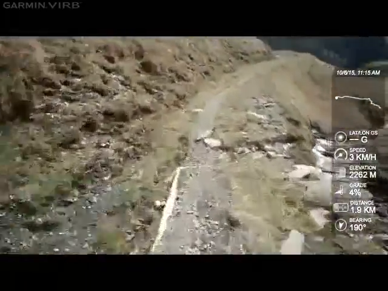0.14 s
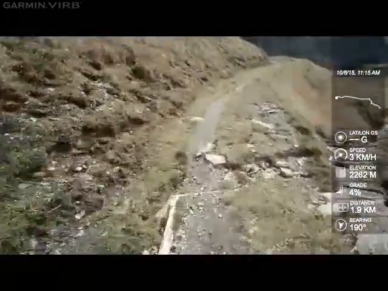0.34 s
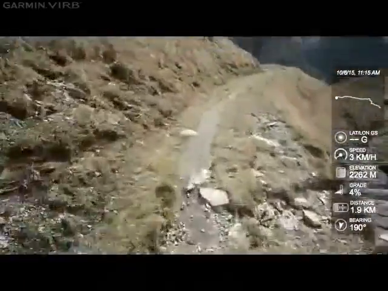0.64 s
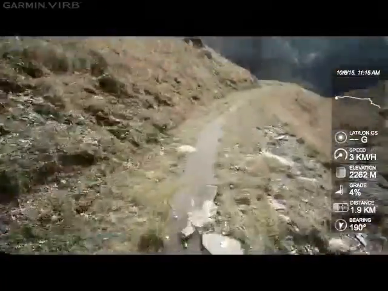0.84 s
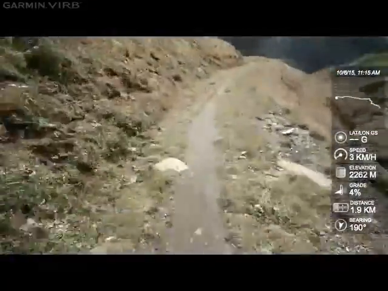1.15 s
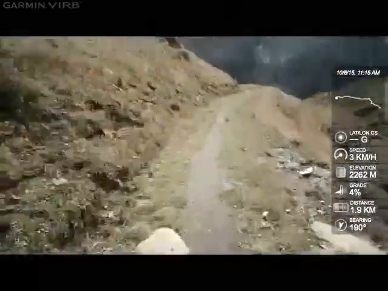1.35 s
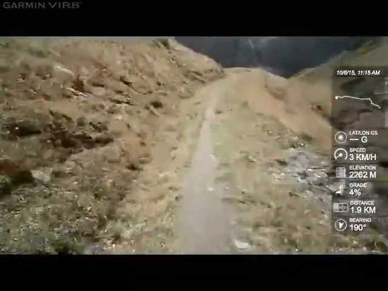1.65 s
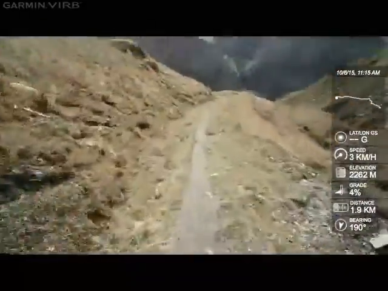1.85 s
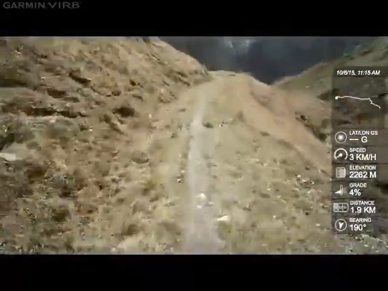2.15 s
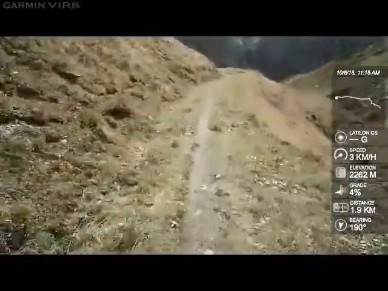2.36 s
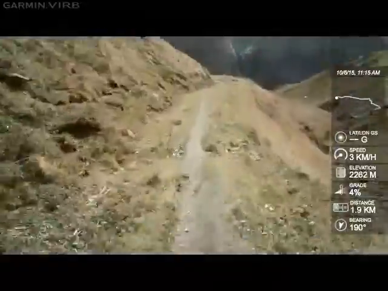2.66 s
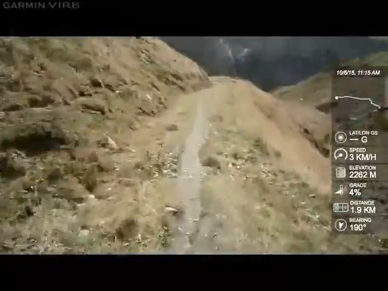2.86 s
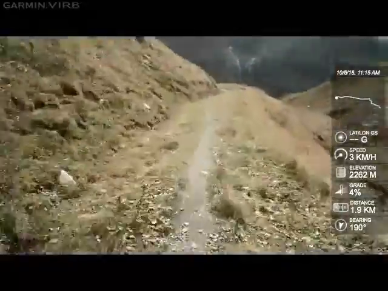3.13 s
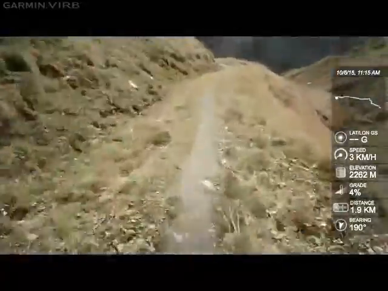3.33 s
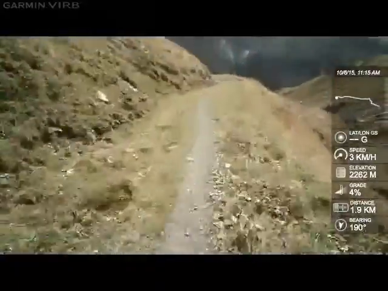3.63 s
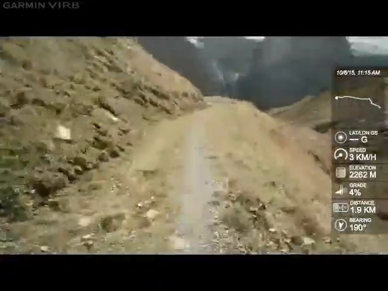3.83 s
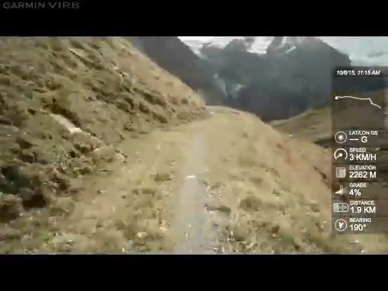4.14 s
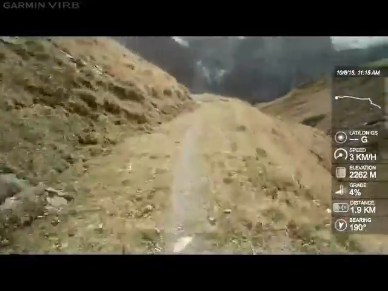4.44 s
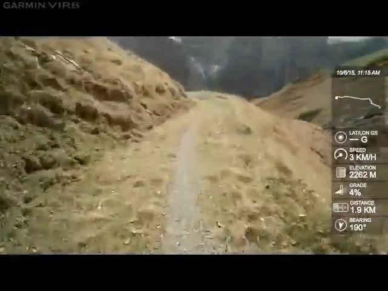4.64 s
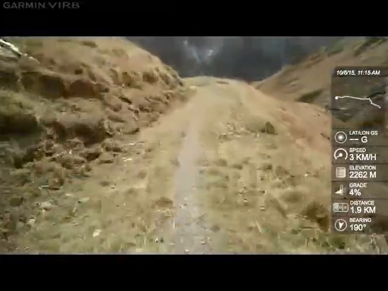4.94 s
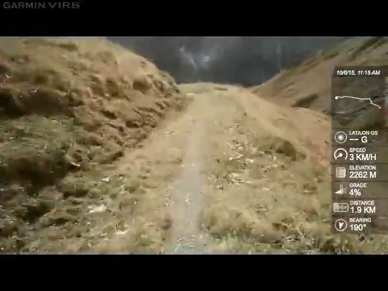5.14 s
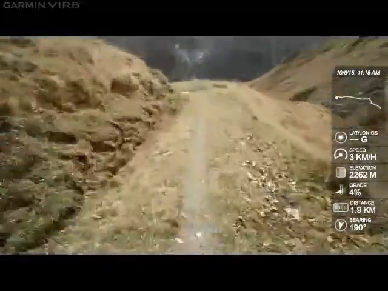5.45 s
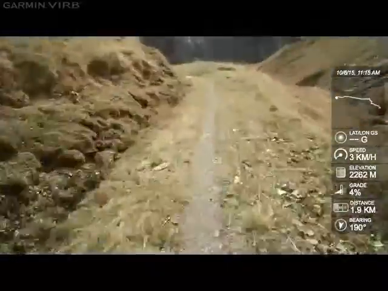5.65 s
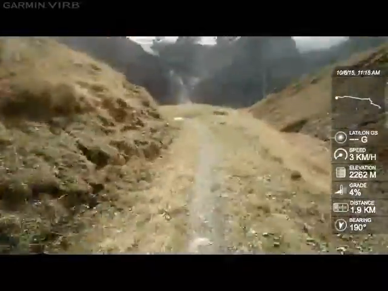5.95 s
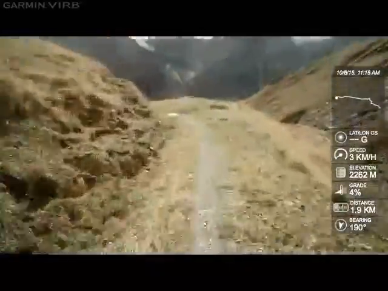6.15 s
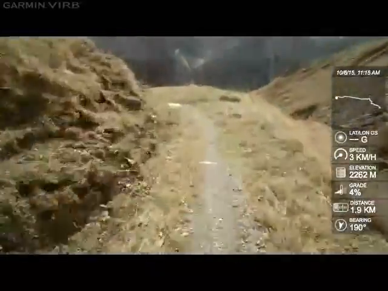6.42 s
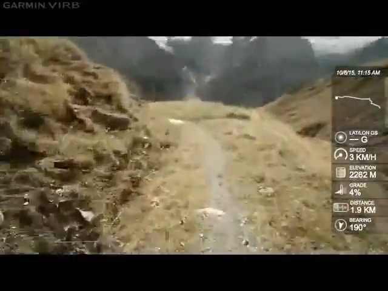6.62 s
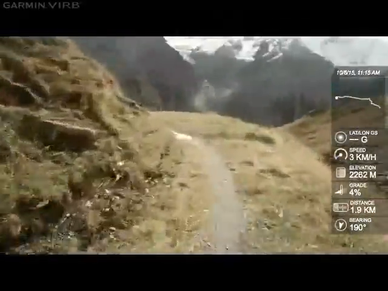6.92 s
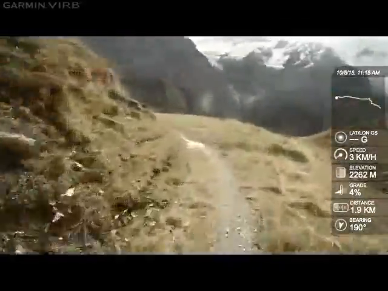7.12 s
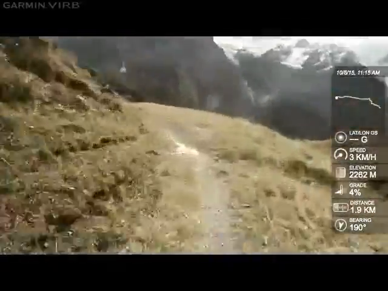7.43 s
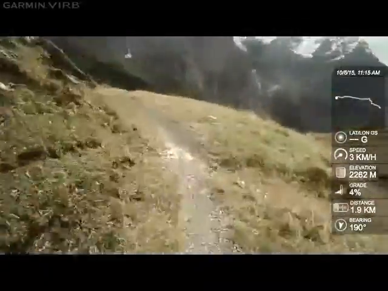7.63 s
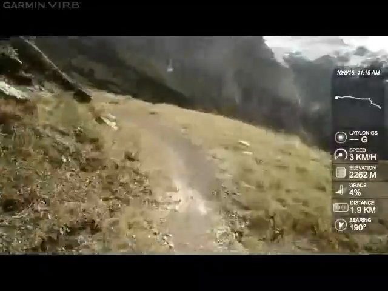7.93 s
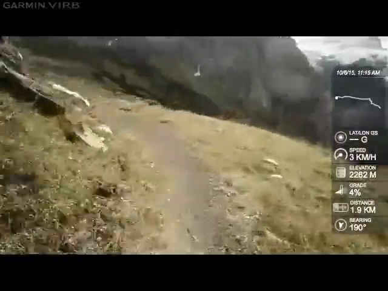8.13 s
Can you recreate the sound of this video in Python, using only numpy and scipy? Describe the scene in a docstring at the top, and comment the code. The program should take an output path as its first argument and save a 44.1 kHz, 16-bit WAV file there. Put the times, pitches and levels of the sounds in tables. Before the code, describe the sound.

Outdoors on a loose gravel trail, a close mono microphone rides on a bike in a plastic case. Low, uneven wind buffeting, a roar and drumming tyre rumble continue throughout over faint hiss, with small pebble clicks and light case rattles. The wind starts moderate; around 0.7-1.1 s gravel crunches and a dry stone clack stands out at 0.8. A dull thud lands at 2.4. From 3 s the airflow grows, and a bright, hard stone snap with crunching grit comes at 3.3. The wind surges at 4 s, a clack follows at 4.8, and the roar peaks near 5.3 amid heavy, low thuds at 5.05, 5.4 and 5.5. Between 6.1 and 6.55 come quick stone clacks, gritty bursts and case knocks. Smaller clicks and rattles continue over 7-7.7 s as the wind eases, with a final thud at 8 before the softer end at 8.3.

```python
"""A mountain bike rolls down loose gravel, heard from a camera that rides along.
From the start, filtered noise makes the wind and tyre rumble, which follow the airflow, and random
impulses make the crunching gravel and clicking pebbles; bumps ring the modes of the plastic case.
Soon single stones snap, as damped rings with noisy edges, and rocks thud through the frame.
The airflow is strongest past the middle, among the heaviest thuds, and eases towards the end."""
import sys
import numpy as np
from scipy.fft import rfft, irfft, next_fast_len
from scipy.io import wavfile
from scipy.ndimage import map_coordinates

SR = 44100
rng = np.random.default_rng(int(sys.argv[2]) if len(sys.argv) > 2 else 0)


def wav_record(signal):
    """Record a signal, one row per channel, as 16-bit PCM in the file named by sys.argv[1]."""
    frames = np.transpose(np.atleast_2d(signal))
    bounded = np.clip(frames, -1, 1)
    # unit amplitude maps onto the largest positive 16-bit level
    quanta = np.round(bounded * 32767).astype(np.int16)
    wavfile.write(sys.argv[1], SR, quanta)


N = 365148

# speed of the air past the camera, as a level: (time [s], level [dB])
AIRFLOW = [(0.0, -32), (0.55, -30.5), (0.8, -28.5), (1.25, -29.5), (1.6, -31), (2.2, -29.5), (3.03, -24),
           (3.3, -24.5), (3.88, -25), (4.04, -20), (4.5, -21.5), (4.85, -22), (5.3, -18.5), (5.65, -22),
           (6.15, -22.5), (6.45, -26), (6.7, -25), (7.0, -22), (7.45, -24), (7.85, -29), (8.28, -31.5)]
# drift of the roar's centre: (time [s], frequency [Hz])
ROAR_CENTRE = [(0, 312.8), (1.2, 294.9), (2.4, 299.7), (3.5, 313.5), (4.15, 281.8), (4.55, 287.8),
               (5.15, 311.7), (5.45, 290), (6.0, 302), (7.1, 302.1), (8.28, 316.8)]
# gusts: (middle [s], half length to 1/e [s], buffet change [dB], drum change [dB], roar change [dB])
GUSTS = [(0.33, 0.06, 3, 1.5, 1), (0.62, 0.037, -4, -4.5, 1), (0.76, 0.031, -2, 3.5, 4),
         (1.04, 0.093, 0, 0, 2), (1.36, 0.085, 4, 3.5, 4), (1.86, 0.11, -2, 5.5, 4),
         (2.75, 0.049, 0.5, -2, -2), (3.24, 0.062, 2, -0.5, -2.5), (3.46, 0.074, 2, 0.5, 0),
         (3.68, 0.088, -1, 5.5, 3.5), (4.05, 0.084, 0.5, -0.5, 4.5), (4.2, 0.056, 4.5, 1.5, 6),
         (4.32, 0.062, -1.5, -5.5, 2), (4.47, 0.042, -2, 5.5, 5.5), (4.58, 0.036, 3, -0.5, -1),
         (4.89, 0.14, 1, 1.5, -1), (5.13, 0.092, 2, -0.5, 1), (5.33, 0.11, 2.5, 2.5, -1),
         (5.43, 0.026, 6.5, -2, 3), (5.55, 0.048, 1.5, 0.5, 0.5), (5.76, .04, 2, 1, 2.5),
         (5.92, 0.047, 2, -4.5, 0.5), (6.18, 0.081, 1, 1, 3.5), (6.56, 0.049, 0, 5.5, 2),
         (6.7, 0.1, 0.5, -3, -2), (6.98, 0.17, -0.5, 1.5, 1.5), (7.45, 0.19, -1, -1.5, -1.5),
         (7.95, 0.2, 6.5, -1, -1)]
# stretches of loose stones: (middle [s], half length to 1/e [s], churn change [dB], grit change [dB])
LOOSE = [(.79, 0.15, 7, 2), (1.08, 0.084, 9.5, 8), (1.06, 0.014, 4, 3), (1.612, 0.046, 7.5, 0),
         (3.04, 0.068, 6.5, 6.5), (3.33, 0.042, 14, 10.5), (3.448, 0.04, 6, 9), (4.02, .06, 2.5, 2),
         (4.25, 0.42, 4.5, 2), (6.25, 0.17, 2, 4), (6.318, .014, 11, 2), (6.378, .015, 13, 3),
         (6.53, 0.026, 9.5, 6), (6.95, 0.28, 5, -0.5), (7.5, .15, 3, 0)]
# bumps that rattle the case: (time [s], low modes before KNOCK_DB [dB], high modes before KNOCK_DB [dB])
BUMPS = [(0.045, -43, -35.5), (0.156, -52, -42), (0.365, -42, -38), (0.436, -36, -51), (0.474, -49, -41),
         (0.692, -45, -40), (0.756, -44, -40), (0.768, -39, -47), (0.802, -33, -49), (0.842, -39, -37.5),
         (0.862, -47, -41), (0.923, -36, -40), (0.9312, -33, -31.5), (1.075, -47, -44), (1.095, -50, -49),
         (1.576, -42, -53), (1.602, -54, -40), (1.615, -49, -43), (1.624, -39, -50), (1.705, -57, -43),
         (2.1058, -35, -36.5), (2.3455, -33, -33), (2.3545, -32, -30.5), (2.475, -40, -37),
         (2.504, -40, -53), (2.718, -37, -40), (2.806, -38, -33), (2.8135, -33, -34), (2.9495, -31, -28.5),
         (2.958, -31, -39), (3.005, -34, -30), (3.043, -48, -33.5), (3.056, -34, -37), (3.28, -53, -36.5),
         (3.343, -49, -31), (3.464, -40, -37), (3.744, -46, -41), (3.788, -37, -37), (3.912, -35, -31.5),
         (3.997, -38, -33), (4.009, -35, -28), (4.018, -33, -32), (4.066, -43, -42), (4.843, -38, -38),
         (5.3205, -23, -46), (5.612, -36, -34.5), (5.961, -36, -39), (6.156, -39, -30), (6.226, -35, -36),
         (6.236, -33, -36), (6.309, -39, -37), (6.318, -26.5, -33), (6.377, -29.5, -33),
         (6.466, -45, -33.5), (6.525, -26, -39), (6.533, -42, -35), (6.764, -38, -37), (6.925, -35, -35),
         (7.071, -44, -39), (7.079, -37, -41), (7.23, -36, -34), (7.287, -38, -33.5), (7.321, -55, -47),
         (7.351, -31.5, -44), (7.404, -37, -45), (7.435, -32, -31), (7.495, -32, -34), (7.583, -48, -36),
         (7.601, -35, -34), (8.1455, -34, -29.5)]
# stones snapping under the tyres: (time [s], clack level [dB], pitch [Hz],
# time to the crest of the ring [cycles], sharp edge level before CRACK_DB [dB])
STONES = [(0.678, -38, 2200, 0.93, -66), (0.737, -37, 1650, 2.1, -72), (0.799, -35, 1500, 1.5, -44),
          (0.8, -23, 1024, 3.1, -70), (1.0518, -31, 1700, 0.68, -61), (1.056, -32, 1700, 1, -60),
          (1.064, -35, 1880, 0.62, -41), (1.23, -49, 2500, .7, -50), (1.462, -41, 2900, 0.83, -50),
          (3.055, -39, 4706, 1.5, -50), (3.3251, -27, 2300, 0.86, -33.5), (3.3349, -30, 2830, 1.9, -46),
          (3.334, -20, 1700, 1.06, -41), (3.431, -45, 2600, .9, -49), (3.463, -34.5, 2150, 3.36, -52.5),
          (4.777, -26.5, 2170, 1.04, -60), (5.03, -47, 4707, 6.5, -58), (5.046, -46, 4600, 5.3, -57),
          (6.088, -30.5, 2058, 1.3, -55), (6.168, -42, 2582, 0.62, -47), (6.174, -29, 1511, 0.83, -59),
          (6.187, -25, 2160, 0.89, -51), (6.377, -24, 1686, 1.2, -55), (6.525, -21.5, 1140, 0.66, -56),
          (6.533, -39, 2500, 1.46, -58), (6.986, -38, 1987, 1.4, -67), (7.106, -36, 2300, .9, -62),
          (7.459, -32, 1986, 1.1, -59), (7.495, -34, 1600, .7, -65), (7.539, -34, 1968, 1.4, -60),
          (7.689, -37, 1890, 1.4, -70), (7.984, -41, 2198, 0.93, -62), (8.022, -36, 2250, 1.34, -62)]
# hard jolts through the frame: (time [s], level before JOLT_DB [dB], pitch [Hz])
JOLTS = [(0.888, -29, 510), (1.052, -35, 650), (1.063, -28.5, 725), (2.374, -10, 249), (5.052, -6.5, 306),
         (5.416, -5.5, 194), (5.528, -3.5, 129), (5.127, -20, 480), (5.905, -24, 500), (6.111, -29, 516),
         (7.983, -18, 430), (7.993, -8, 215), (7.995, -19, 520)]
# modes of the plastic case, before random scatter: (frequency [Hz], relative level [dB], 60 dB decay [s])
CASE_MODES = [(925, 1.5, 0.02), (1021, -2.5, 0.024), (1270, -4.5, 0.017), (1810, -8.5, 0.015),
              (1778, -17, 0.05), (1882, -4, 0.019), (2000, -10.5, 0.023), (3140, -22, 0.016)]

# Spectral shapes, each later scaled to rms 1: (frequency [Hz], relative level [dB])
# eddies at the microphone
BUFFET = [(10, -14), (20, -2), (40, -3.5), (70, 1), (110, 0.5), (140, -2.5), (180, -18.5), (230, -32),
          (500, -71.5), (1000, -120)]
# resonance of the drumming tyres
DRUM = [(70, -26), (120, -7.5), (150, -0.5), (185, -0.5), (215, .5), (250, -2), (300, -16), (400, -29.5),
        (1000, -94.5)]
# low roar of the wind
ROAR = [(130, -27), (230, -5), (275, 1), (320, 2), (370, -4), (425, -8), (475, -7.5), (540, -14),
        (620, -18), (760, -27.5), (1200, -38), (2500, -71), (6000, -120)]
# hollow rush around the case
RUSH = [(300, -17.5), (600, -4), (750, 3.5), (860, -2), (1010, 3.5), (1250, -2.5), (1450, -8), (1820, -8),
        (2100, -10), (2500, -15.5), (3100, -28), (3700, -27), (6000, -43), (10400, -57.5)]
# fine hiss of the airflow
WHISK = [(1500, -20.5), (3100, 5), (3800, -4.5), (4650, 2.5), (5400, -6), (7000, -4), (9000, -7),
         (10400, -13)]
# the microphone's own steady hiss
HISS = [(100, -1), (1000, 1), (3100, 2.5), (3800, 0.5), (5500, 0), (6600, 0), (8500, -0.5), (10400, -2)]
# grit under the tread
GRIT = [(500, -36.5), (1200, -2.5), (2000, 4.5), (3100, 0.5), (4000, 1), (5500, -2.5), (6600, -1),
        (8500, -5), (10400, -8)]
# the case driven by many small stones
GRIND = [(400, -23), (800, -1.5), (1000, 10), (1200, -4.5), (1550, -0.5), (1800, 4), (2080, -3.5),
         (2400, -10), (3100, -15.5), (4000, -31), (10400, -38)]
# sharp edge of a stone's snap
EDGE = [(1500, -27), (3000, 2), (4500, -4), (5500, -0.5), (6450, 1.5), (7500, -4.5), (9200, -10),
        (10400, -22.5)]

# laws of growth: (level at cruising flow [dB], gain per dB of flow [dB])
CRUISE_DB = -24
BUFFET_LAW, DRUM_LAW, ROAR_LAW = (-26, 1), (-25, 0.82), (-28.5, 1.2)
RUSH_LAW, WHISK_LAW = (-51, 1.48), (-70.5, 2.8)
CHURN_LAW, GRIT_LAW = (-57, 0.81), (-67.5, .1)
PEBBLE_LAW, RATTLE_LAW = (-44.5, 1.45), (-51, .7)

ROAR_REST_HZ = 300  # centre at which the roar is left unshifted
DRUM_WANDER_OCTAVES = .08
PEBBLES_PER_S, PEBBLE_SPREAD_DB = 24, 5
PEBBLE_HZ, PEBBLE_OCTAVES = 1597, 0.44  # middle pitch and its spread either way
PEBBLE_CYCLES = 0.96  # mean cycles to the crest
RATTLES_PER_S, RATTLE_SPREAD_DB = 8.6, 2  # small random bumps
KNOCK_DB = -2  # the ring, over a bump's level
SPRAY_DB, SPRAY_T60_S = -18, .04  # the rebounds: level over the bump's high modes, decay
CRACK_DB, CRACK_T60_S, CRACK_ATTACK_S = 6.5, .009, .0004  # sharp edge of a stone's snap
JOLT_DB = -4.5  # the thud, over a jolt's level
TOP_HZ = 10400


def amp(db):
    """Logarithmic level: decibels to amplitude gain."""
    return 10 ** (np.asarray(db) / 20)


def unit(x):
    """Normalisation of power: scale to rms 1."""
    return x / np.sqrt(np.mean(x ** 2) + 1e-20)


def curves(rows):
    """Linear interpolation: one value per sample for each column after the time."""
    times, *columns = np.transpose(rows)
    return [np.interp(np.arange(N) / SR, times, column) for column in columns]


def wobble(rate):
    """Slow random modulation: a smooth curve through `rate` random knots a second."""
    knots = rng.standard_normal(int(N * rate / SR) + 4)
    return map_coordinates(knots, [np.arange(N) * rate / SR])


def filtered(x, response):
    """Linear filtering: multiply the spectrum of x by a response of frequency."""
    size = next_fast_len(N + SR // 2)
    hz = np.fft.rfftfreq(size, 1 / SR)
    return irfft(rfft(x, size) * response(hz), size)[:N]


def coloured(x, spectrum):
    """Spectral shaping: x weighted by levels joined on a log frequency axis, at rms 1."""
    f, db = np.transpose(spectrum)
    return unit(filtered(x, lambda hz: amp(np.interp(np.log(hz + 1), np.log(f), db))))


def noise(spectrum):
    """Coloured noise: fresh Gaussian noise of rms 1 with the given spectral shape."""
    return coloured(rng.standard_normal(N), spectrum)


def impacts(rate, spread_db):
    """Random impulse process: `rate` impulses a second on average, most small and a few large."""
    chance = rng.random(N)
    size = rng.exponential(size=N)
    sign = rng.choice([-1, 1], N)
    return (chance < rate / SR) * sign * amp(spread_db * np.minimum(size, 4))


def add(track, s, sound):
    """Superposition: mix a sound into the track at time s."""
    part = track[max(round(s * SR), 0):][:len(sound)]
    part += sound[:len(part)]


def driven(law):
    """Power law of flow: the level in dB of a layer rises in proportion to the airflow level."""
    flow_db, = curves(AIRFLOW)
    cruise_db, growth = law
    return cruise_db + growth * (flow_db - CRUISE_DB)


def swells(rows):
    """Gaussian envelopes: summed rises or dips in dB, a curve for each column after the half length."""
    t = np.arange(N) / SR
    return sum(np.outer(changes, np.exp(-((t - s) / half) ** 2)) for s, half, *changes in rows)


def gliding(x, ratio):
    """Variable-rate reading: x with all its frequencies scaled by a moving ratio."""
    return map_coordinates(x, [np.cumsum(ratio)], mode="mirror")


def blip(t, hz, cycles):
    """Damped oscillation: a ring of peak near 1 whose envelope crests after the given cycles."""
    u = t * hz / cycles
    envelope = (u * np.exp(1 - u)) ** 2
    return envelope * np.sin(2 * np.pi * hz * t)


def case_ring(t, low_db, high_db, scatter_db, attack, split_hz=1200):
    """Modal synthesis: a blow excites decaying modes, with set peaks for the low and high groups."""
    hz, db, t60 = np.transpose(CASE_MODES)[:, :, None]
    strength, detune, offset = rng.standard_normal((3,) + hz.shape)
    phase = 2 * np.pi * (hz * (1 + 0.018 * detune) * t + 0.07 * offset)
    envelope = amp(db + scatter_db * strength - 60 * t / t60) * (1 - np.exp(-t / attack)) ** 2
    modes = envelope * np.sin(phase)
    low = np.sum(modes * (hz < split_hz), axis=0)
    high = np.sum(modes * (hz >= split_hz), axis=0)
    return amp(low_db) * low / np.abs(low).max() + amp(high_db) * high / np.abs(high).max()


def microphone_hiss():
    """Stationary self-noise: the microphone's own steady hiss."""
    return amp(-60) * noise(HISS)


def wind_and_tyres():
    """Turbulence and resonance: eddies buffet the microphone, tyres drum, air rushes round the case."""
    eddies, surges = wobble(45), wobble(9)
    gust_buffet_db, gust_drum_db, gust_roar_db = swells(GUSTS)

    buffet_db = driven(BUFFET_LAW) + gust_buffet_db + 0.73 * wobble(5)
    buffet = amp(buffet_db) * noise(BUFFET)

    drum_db = driven(DRUM_LAW) + gust_drum_db + .6 * surges + 0.41 * eddies
    drum_ratio = 2 ** (DRUM_WANDER_OCTAVES * wobble(7))
    drum = amp(drum_db) * gliding(noise(DRUM), drum_ratio)

    roar_hz, = curves(ROAR_CENTRE)
    roar_db = driven(ROAR_LAW) + gust_roar_db + 0.68 * surges + 1.25 * eddies
    roar = amp(roar_db) * gliding(noise(ROAR), roar_hz / ROAR_REST_HZ)

    rush_db = driven(RUSH_LAW) + 1.1 * eddies + 0.68 * wobble(160)
    rush = amp(rush_db) * noise(RUSH)

    # the fine hiss grows faster with the airflow than the rush does
    whisk = amp(driven(WHISK_LAW) + 1.4 * eddies) * noise(WHISK)
    return buffet + drum + roar + rush + whisk


def gravel():
    """Granular excitation: grit crackles in clumps while bigger stones churn and chatter the case."""
    loose_churn_db, loose_grit_db = swells(LOOSE)
    grit_db = driven(GRIT_LAW) + loose_grit_db + 2.5 * wobble(25)
    grit = coloured(impacts(rate=1500, spread_db=3.0), GRIT) * amp(grit_db)
    churn_db = driven(CHURN_LAW) + loose_churn_db + 4.3 * wobble(70)
    churn = coloured(impacts(rate=700, spread_db=2.0), GRIND) * amp(churn_db)
    return grit + churn


def pebbles():
    """Random collisions: small stones click, each at its own pitch, harder in faster airflow."""
    out, t = np.zeros(N), np.arange(SR // 50) / SR
    level_db = driven(PEBBLE_LAW)
    for when, force, size, damping in rng.random((round(PEBBLES_PER_S * N / SR), 4)):
        db = level_db[int(when * N)] + PEBBLE_SPREAD_DB * (2 * force - 1)
        hz = PEBBLE_HZ * 2 ** (PEBBLE_OCTAVES * (2 * size - 1))
        add(out, when * N / SR, amp(db) * blip(t, hz, PEBBLE_CYCLES * (.5 + damping)))
    return out


def small_bumps():
    """Random excitation: bumps at random times, with levels that grow with the airflow."""
    rattle_db = driven(RATTLE_LAW)
    bumps = []
    for when, *forces in rng.random((round(RATTLES_PER_S * N / SR), 3)):
        spread_db = RATTLE_SPREAD_DB * (2 * np.array(forces) - 1)
        low_db, high_db = rattle_db[int(when * N)] + spread_db
        bumps.append((when * N / SR, low_db, high_db))
    return bumps


def knocks():
    """Impulsive excitation: each bump rings the case briefly and sets off a short spray of rebounds."""
    rings, spray, t = np.zeros(N), np.zeros(N), np.arange(SR // 10) / SR
    for s, low_db, high_db in list(BUMPS) + small_bumps():
        add(rings, s, case_ring(t, low_db, high_db, scatter_db=1.5, attack=.0014))
        decay = amp(high_db + SPRAY_DB - 60 * t / SPRAY_T60_S)
        add(spray, s, decay * (1 - np.exp(-t / 0.0012)))
    rebounds = coloured(impacts(rate=1500, spread_db=3.0), GRIND)
    return amp(KNOCK_DB) * rings + spray * rebounds


def stones():
    """Sudden release: a pinched stone gives a damped dry clack with a sharp crack of noise on top."""
    clacks, cracks, t = np.zeros(N), np.zeros(N), np.arange(SR // 20) / SR
    for s, db, hz, cycles, edge_db in STONES:
        add(clacks, s, amp(db) * blip(t, hz, cycles))
        decay = amp(edge_db + CRACK_DB - 60 * t / CRACK_T60_S)
        add(cracks, s, decay * (1 - np.exp(-t / CRACK_ATTACK_S)))
    return clacks + cracks * noise(EDGE)


def jolts():
    """Heavily damped resonance: bigger rocks send a dull thud through the frame."""
    out, t = np.zeros(N), np.arange(SR // 10) / SR
    for s, db, hz in JOLTS:
        add(out, s, amp(db + JOLT_DB) * blip(t, hz, cycles=0.97))
    return out


def scene():
    """Superposition: the layers of the ride add up, as one channel."""
    air = microphone_hiss() + wind_and_tyres()
    ground = gravel() + pebbles() + knocks() + stones() + jolts()
    return (air + ground)[None]


def record(dry):
    """Band limitation: the camera keeps nothing from its upper limit on."""
    return np.array([filtered(x, lambda hz: hz < TOP_HZ) for x in dry])


dry = scene()
out = record(dry)
wav_record(out)
```